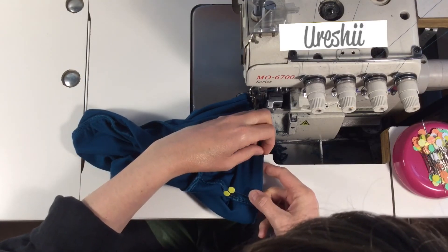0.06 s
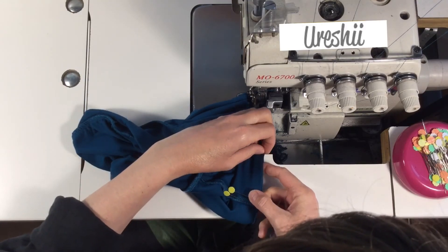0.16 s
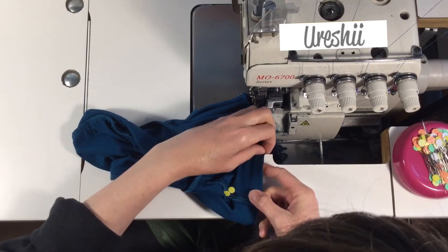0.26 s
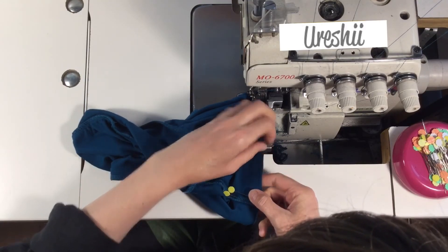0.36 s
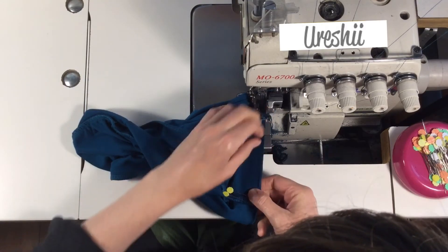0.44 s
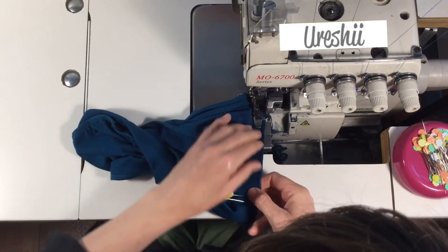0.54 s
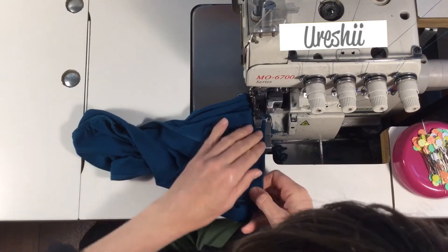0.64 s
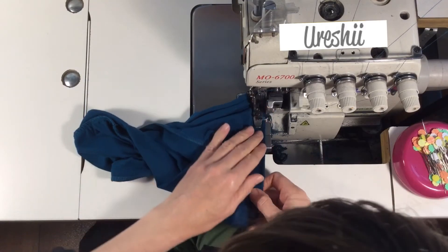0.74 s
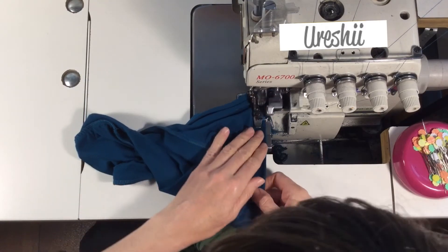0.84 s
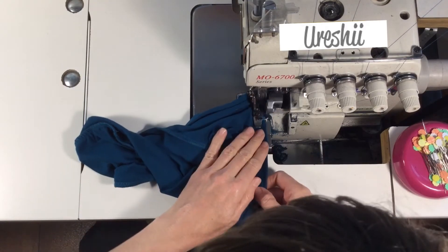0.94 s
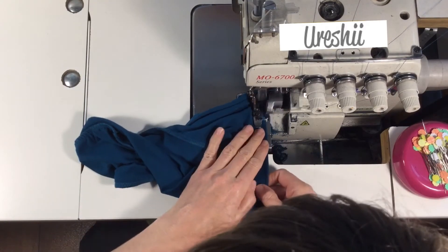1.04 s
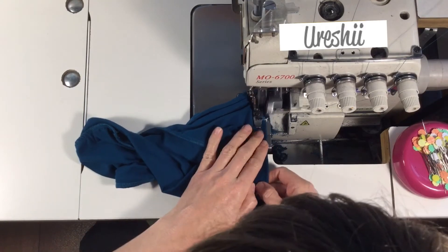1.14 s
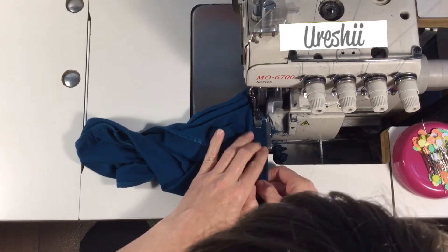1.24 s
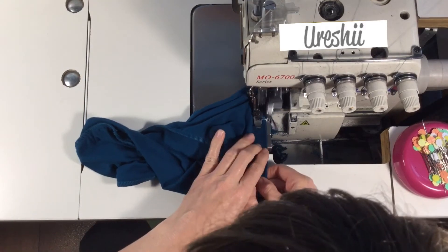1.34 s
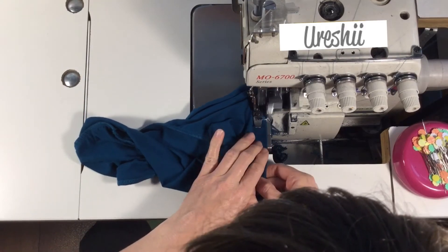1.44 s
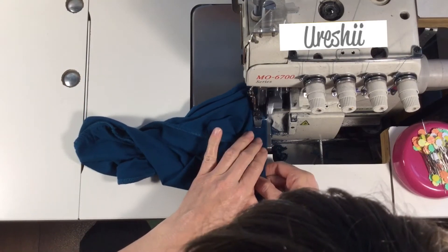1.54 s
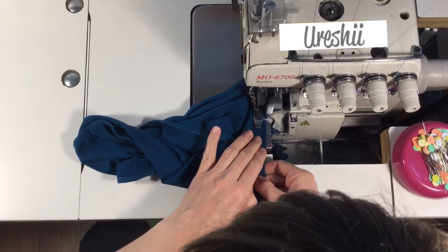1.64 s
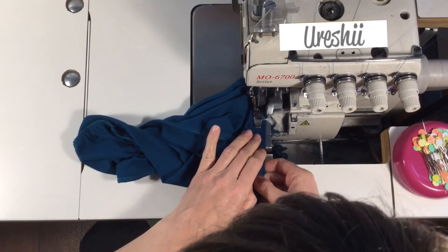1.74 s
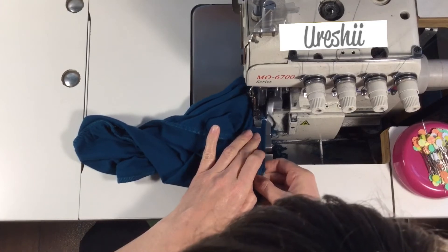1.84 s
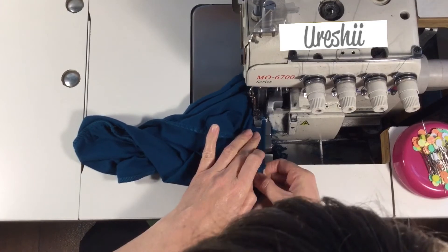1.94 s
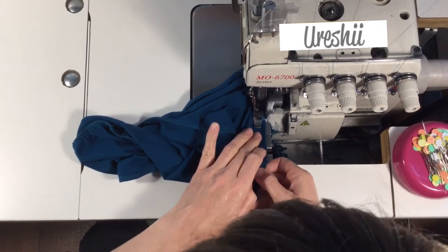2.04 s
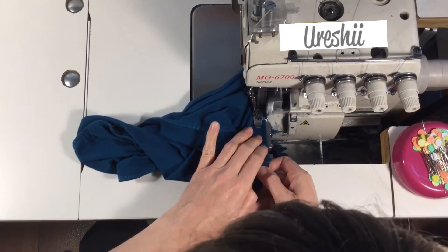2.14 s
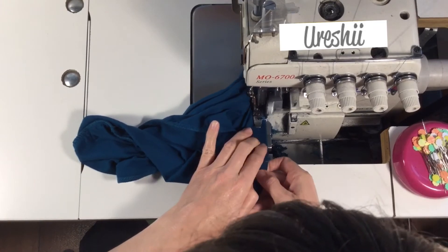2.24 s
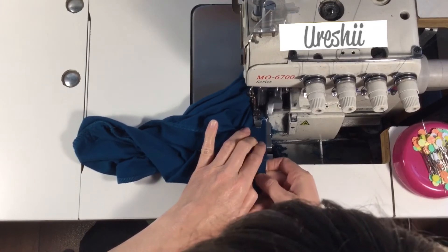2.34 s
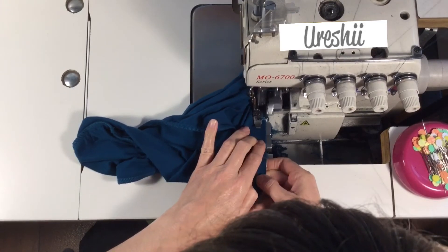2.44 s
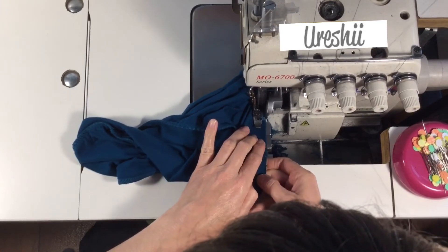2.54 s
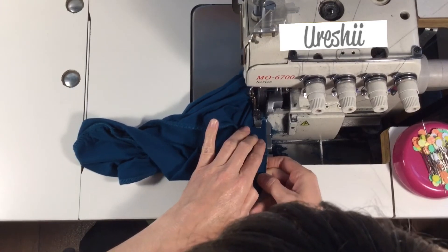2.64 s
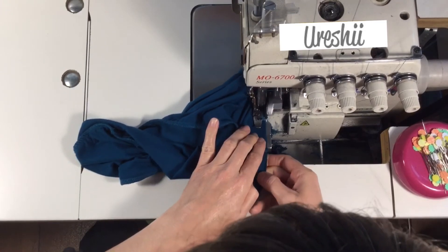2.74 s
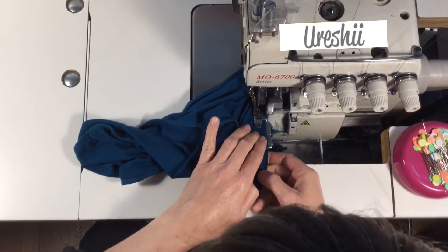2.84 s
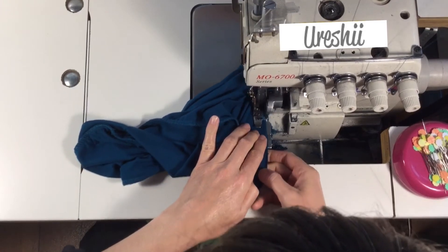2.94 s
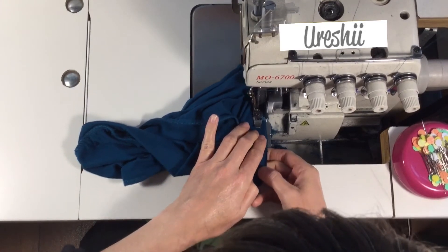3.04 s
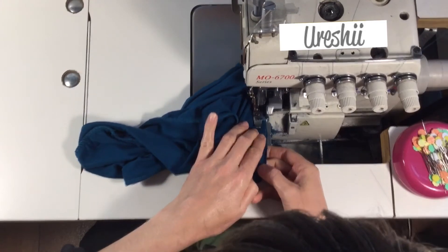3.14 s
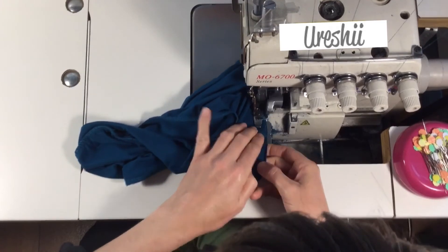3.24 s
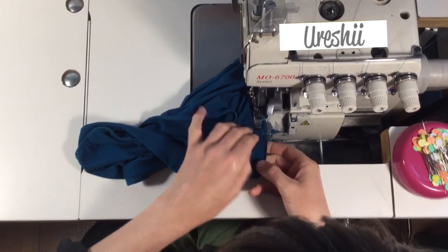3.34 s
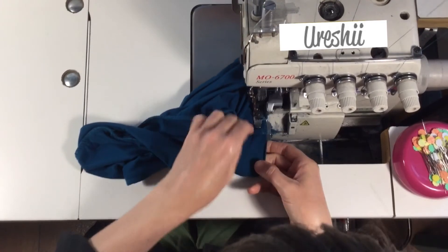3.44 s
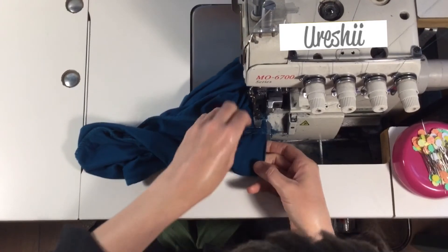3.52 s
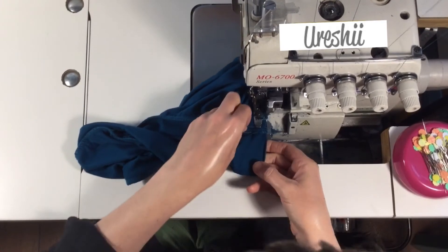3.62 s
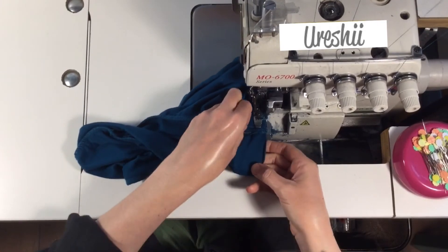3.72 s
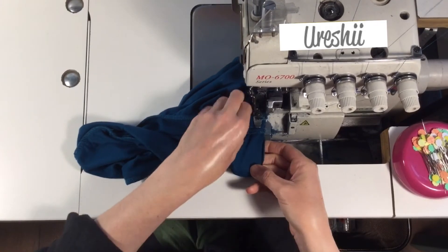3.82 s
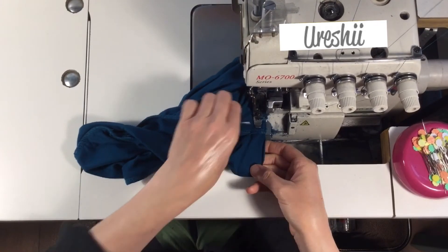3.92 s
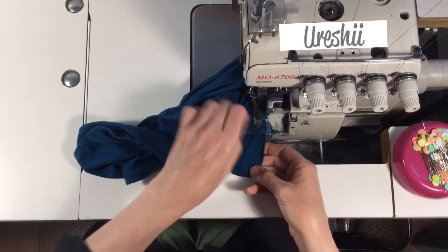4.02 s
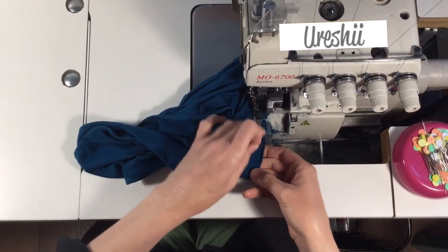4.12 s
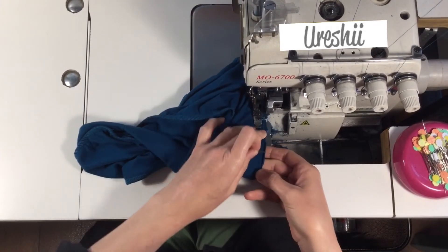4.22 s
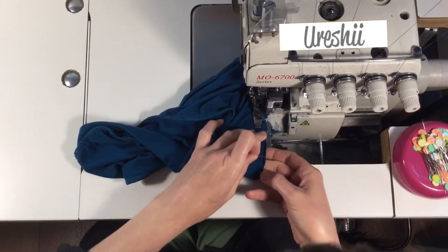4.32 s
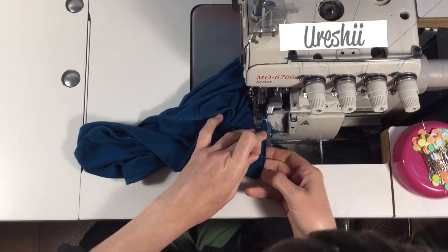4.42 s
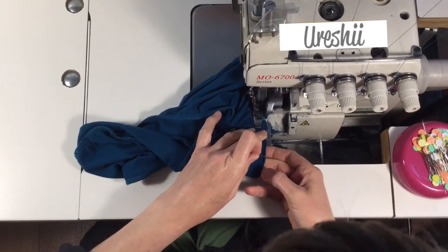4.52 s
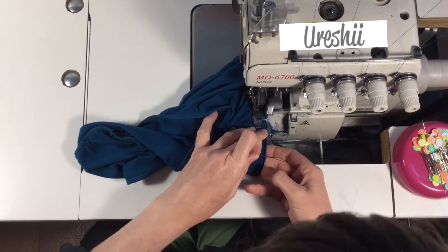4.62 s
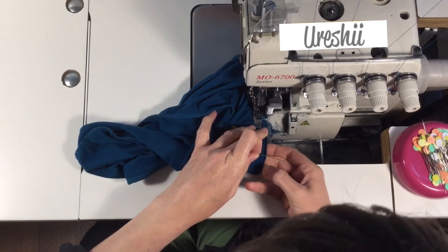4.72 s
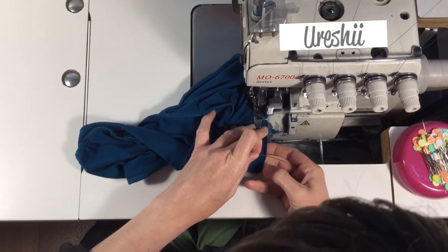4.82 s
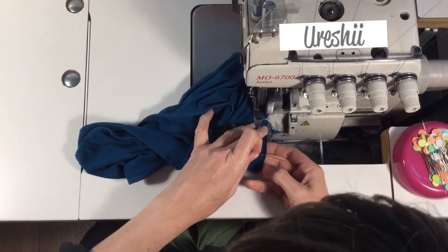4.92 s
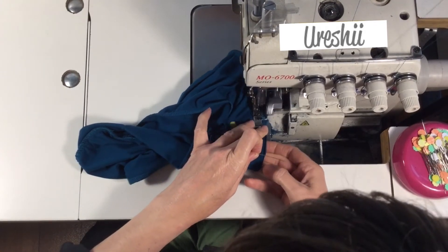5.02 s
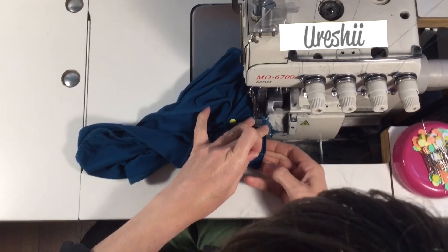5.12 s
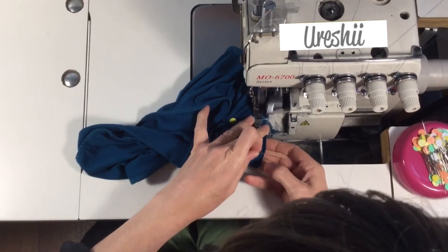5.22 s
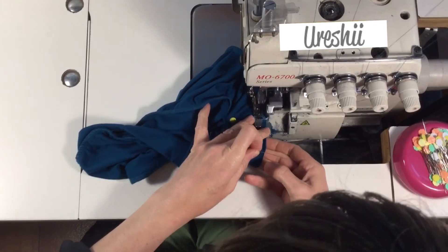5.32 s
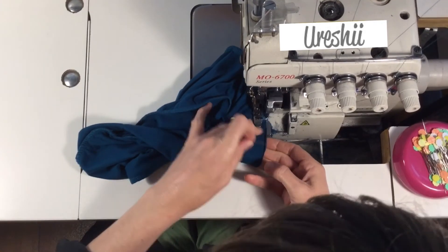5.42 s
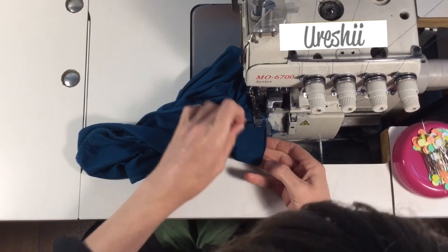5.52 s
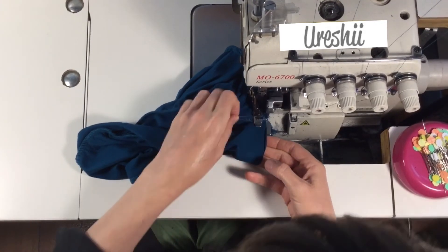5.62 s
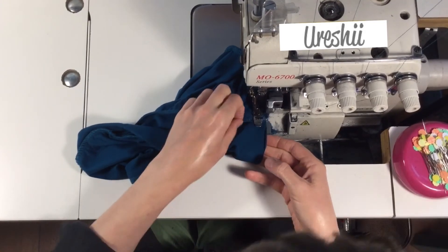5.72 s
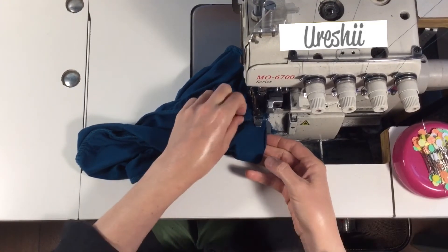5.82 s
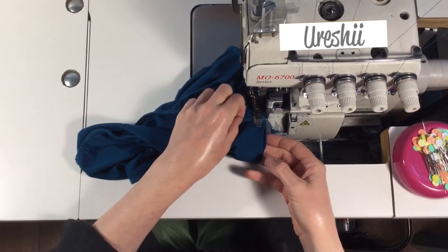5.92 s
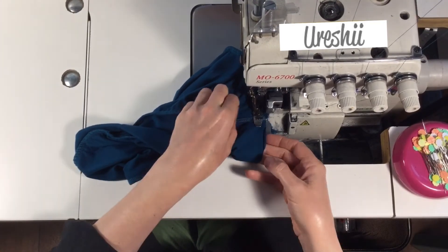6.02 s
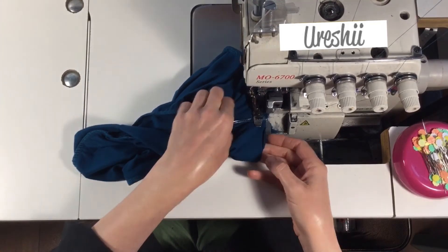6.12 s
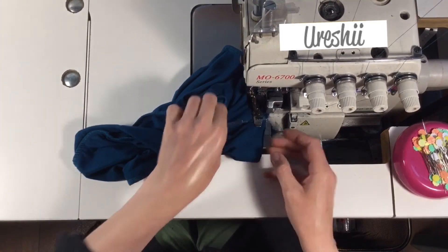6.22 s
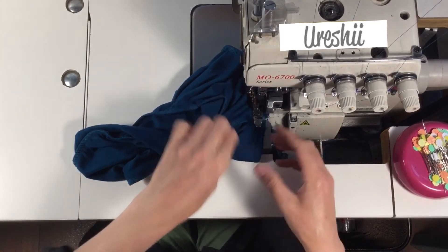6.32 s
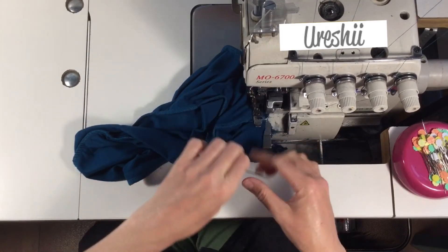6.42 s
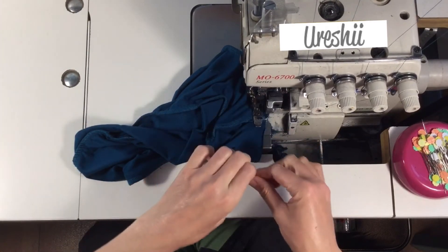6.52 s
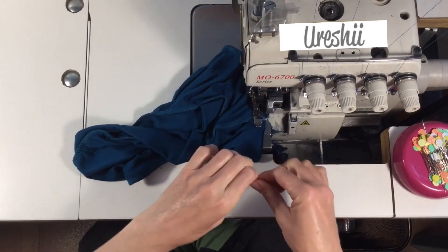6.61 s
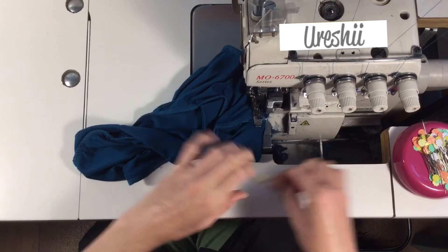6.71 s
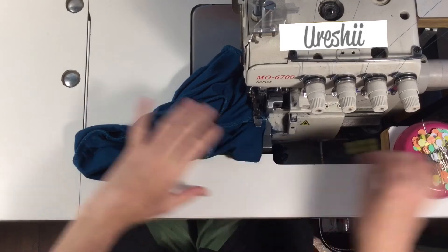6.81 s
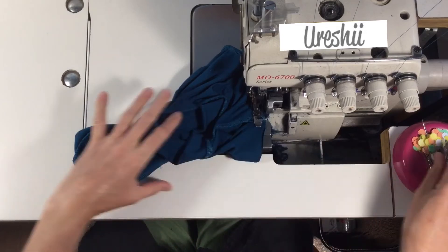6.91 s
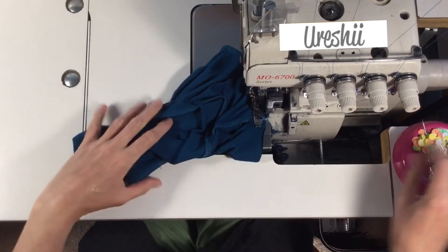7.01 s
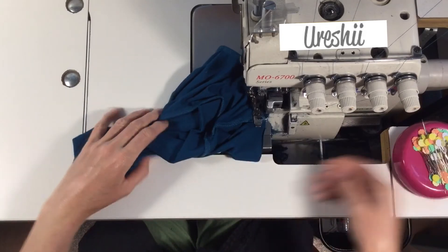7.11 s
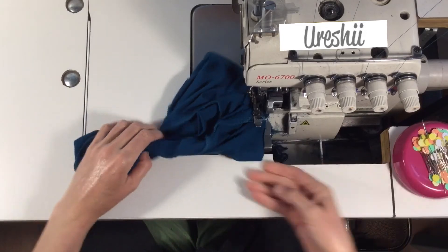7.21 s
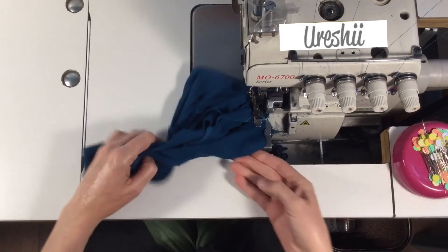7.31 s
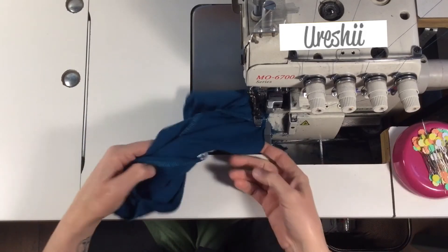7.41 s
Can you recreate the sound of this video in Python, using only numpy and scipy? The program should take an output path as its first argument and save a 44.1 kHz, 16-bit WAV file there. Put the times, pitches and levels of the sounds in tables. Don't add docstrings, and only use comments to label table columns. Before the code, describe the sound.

Close, dry perspective above an overlocker on a wooden table, in a quiet room with a low hush and short reverberation. At 0.6-0.75 seconds the pedal and linkage knock and the clutch bites. From 0.84 the machine starts slowly, races to about 23 stitches a second by 1.35, then settles near 18: crisp knife and looper clicks, ringing cover plate, gliding toothed-belt whine, gritty clutch rub and casing rattle, varying with the seam. It slows after 3.2; the brake clunks and hisses around 3.4, stopping by 3.5. A tiny tick falls at 3.85. Knocks at 4.2-4.3 begin a shorter burst, distinct slow clicks from 4.42 accelerating to 5.1, then a solid brake clunk at 5.2 and fading drag. Small ticks at 5.75 and 6.0. At 6.88 pins land in a bright, glassy scatter with brief cloth rustle; light ticks and faint fabric follow around 7.3.

```python
import sys
import numpy as np
from scipy import signal
from scipy.fft import rfft, irfft, next_fast_len
from scipy.io import wavfile
from scipy.ndimage import uniform_filter1d, map_coordinates

SR = 44100
rng = np.random.default_rng(int(sys.argv[2]) if len(sys.argv) > 2 else 0)


def volts(x):
    e = np.asarray(x, float) / 20
    return 10 ** e


def dump_mix(stems):
    frames = np.atleast_2d(stems).T
    limited = np.clip(frames, -1, 1)
    pcm = np.round(limited * 32767).astype(np.int16)
    wavfile.write(sys.argv[1], SR, pcm)


N = 328986

# clutch_engages_s, first_stitch_s, pedal_lifts_s, shaft_stops_s, knife_click_db
RUNS = [
    (0.732, 0.8391, 3.306, 3.52, -34.5),
    (4.325, 4.4194, 5.15, 5.43, -39.5),
]
# time_s, stitches_per_s
SPEED_LONG = [(0.838, 4.43), (1.001, 8.22), (1.208, 20.71), (1.349, 22.78), (1.571, 19.18), (1.853, 18.3),
              (2.254, 19.06), (2.479, 17.29), (2.969, 17.43), (3.233, 16.05), (3.36, 9.08)]
# time_s, stitches_per_s
SPEED_SHORT = [(4.42, 4.53), (4.6, 7.93), (4.79, 10.29), (4.97, 16.27), (5.06, 17.56), (5.2, 15.34)]
# time_s, extra_blow_db
SEAM = [(.84, -3.5), (1.0, 2.5), (1.1, -0.5), (1.21, 4.5), (1.36, -2), (1.98, 4.5), (2.12, -4.5),
        (2.6, 0.5), (2.76, -4), (3.2, 4.5), (3.27, -1.5), (3.35, -11), (4.42, -3), (4.7, -4.5), (4.81, 1),
        (4.89, -4), (4.96, 2), (5.13, 0.5)]
WHINE_ORDERS = [1, 2, 3, 3.5, 4]
# centre_hz, width_hz, level_db
MOUNT = [(185, 55, 10.5), (388, 46, 9), (483, 110, 4), (704, 40, 10), (850, 50, 11), (1407, 55, 10),
         (1580, 80, 8.5), (1850, 52, 2)]
# centre_hz, width_hz, level_db
BOARD = [(298.2, 20.4, 9)]
# centre_hz, width_hz, level_db
CLUTCH = [(3232, 94, 1.5), (3488, 58, -1), (3680, 100, -6.5), (3880, 130, -5.5), (4080, 60, -4),
          (3525, 28, -8.5)]
# centre_hz, width_hz, level_db
PLATES = [(2900, 275, 6), (5050, 120, -9), (8770, 410, -3.5), (11260, 170, -10), (14500, 5600, -14.5),
          (6700, 3200, -19.5), (10400, 3300, -23)]
# centre_hz, width_hz, level_db
CASING = [(584, 59, 6), (796, 173, -0.5), (1208, 210, 2), (1405, 60, 6), (1572, 32, 4), (1810, 107, 4.5),
          (2300, 1300, -8.5)]
# centre_hz, width_hz, level_db
TABLE = [(59, 32, -2), (133, 51, -2), (196, 44, -3), (304, 48, 1), (396, 98, -1.5)]
# pitch_hz, level_db, t60_s
COVER = [(723.7, 1, 0.057), (723.4, -16, 0.13), (594, -5.5, 0.032), (1822, -1.5, 0.029), (5100, -27, 0.06)]
# freq_hz, level_db
KNIFE = [(2000, 10.5), (4000, 8.5), (6000, 4), (9000, 2.5), (12000, -9), (15500, -2)]
# centre_hz, width_hz, level_db
LOOPER = [(6160, 1100, -15.5), (11160, 660, 8.5), (13700, 2000, 3)]
# freq_hz, density_db_per_hz
PEDAL = [(180, -63), (300, 3.5), (560, 1), (1320, -5), (1630, -7), (2470, -16), (2840, -12), (4000, -5),
         (5000, -9.5), (6500, -37), (11000, -120)]
# centre_hz, width_hz, level_db
LINK = [(1570, 170, -0.5), (1960, 66, 0.5), (2250, 250, -2)]
# (thud_db, bright_db, link_ring_db, clutch_bite_db), [(time_s, peak_db), ..]
TOUCH = (-28, -31, -5.5, -16), [(.58, -37.5), (4.176, -36.5)]
SLACK = (-10, -21, -5.5, -41), [(.673, -37.5), (4.26, -40.5)]
BITE = (-12, -22, -22, 1), [(.735, -39), (.825, -51.5), (4.326, -41.5)]
BRAKE = (-10, -14.5, -30, -34), [(3.375, -31.5), (3.392, -36), (5.203, -29.5), (5.218, -39), (5.233, -39.5)]
SETTLE = (-10, -27, -7, -24), [(3.422, -40.5), (3.445, -46.5), (5.268, -52)]
DRAG = (-25, -28, -9, 5), [(3.47, -54), (3.51, -67), (5.345, -57), (5.372, -55), (5.44, -76)]
KNOCK_THUMP_DB = [-15.5, -25, -15.5]
# time_s, mode_1_db, mode_2_db, mode_3_db
JOLTS = [(3.198, -35, -46, -45), (3.263, -35, -53, -47), (3.297, -41, -50, -62), (3.496, -46.5, -62, -63),
         (3.549, -52, -70, -75), (4.503, -45, -52, -60), (4.559, -47, -66, -58), (5.138, -33, -34, -30.5),
         (5.162, -55, -40, -60), (5.266, -37.5, -56, -41)]
# pitch_hz, t60_s
LEGS = [(135, 0.13), (305, 0.14), (580, 0.063)]
# time_s, peak_db, low_part_db, t60_s, dish_ring_db
TICKS = [(3.577, -67, -12, 0.039, -11), (3.5935, -68, -14, 0.038, -6), (3.8462, -49.5, -19, 0.05, -14),
         (5.747, -45, -17.5, 0.058, -24), (6.0092, -57, -14, 0.059, -10),
         (7.2606, -45.5, -21.5, 0.076, -9.5), (7.2894, -48, -24, 0.058, -11), (7.311, -50, -20, 0.05, -12),
         (7.3407, -50, -1.5, 0.047, -17)]
# time_s, peak_db, low_part_db, t60_s, dish_ring_db
DROP = [
    (6.873, -36.5, -41, 0.066, -10),
    (6.88, -20, -34.5, 0.06, -19.5),
    (6.8876, -24.5, -20, 0.04, -22),
    (6.8936, -28, -30, 0.04, -20),
]
# freq_hz, density_db_per_hz
PINS = [(1180, -9), (2000, -10), (2880, -14.5), (3510, -6.5), (4280, -10), (4590, -3.5), (5450, -12),
        (10100, -7), (13900, 2.5), (15800, -5.5)]
# centre_hz, width_hz, level_db
DISH = [(5520, 380, 8), (6430, 480, 4), (8630, 880, 2), (10400, 610, -13)]
# peak_s, peak_db, swell_s, fade_s (both to -20 dB)
RUSTLE = [(5.762, -71, .01, 0.071), (6.17, -67.5, 0.13, .1), (6.92, -52, .01, 0.098),
          (7.19, -66, 0.19, .15), (7.264, -66, .04, .02), (7.4, -75, .4, .4)]
# freq_hz, t60_s
WALLS = [(200, 0.63), (2000, 0.3), (10000, 0.17)]
# freq_hz, density_db_per_hz
HUSH = [(15, -43), (25, -12.5), (64, -4), (195, -10), (277, -6), (317, -14), (373, -14), (489, -21),
        (677, -20.5), (1130, -26), (1440, -30), (3520, -32), (16000, -41)]


def unit(x):
    return x / np.sqrt(np.mean(x ** 2) + 1e-20)


def along(points, hz):
    f, v = np.transpose(points)
    return np.interp(np.log(hz + 1), np.log(f + 1), v)


def wobble(rate_hz):
    knots = rng.standard_normal(int(N * rate_hz / SR) + 4)
    return map_coordinates(knots, [np.arange(N) * rate_hz / SR])


def filtered(x, response):
    m = next_fast_len(N + SR // 2)
    return irfft(rfft(x, m) * response(np.fft.rfftfreq(m, 1 / SR)), m)[..., :N]


def body(modes):
    def mode(f, c, w, db):
        return volts(db) * 1j * f * w / (c * c - f * f + 1j * f * w)
    return lambda f: sum((-1) ** k * mode(f, *row) for k, row in enumerate(modes))


def colour(points):
    return lambda f: volts(along(points, f)) * (f > .7 * points[0][0])


def hiss(response, rough_db=0, rate=150):
    grain = volts(rough_db * wobble(rate)) if rough_db else 1
    return unit(filtered(rng.standard_normal(N) * grain, response))


def bursts(times, dbs, t60, rise=0.00037):
    env, t = np.zeros(N + SR), np.arange(SR // 3) / SR
    for s, db, d in np.broadcast(times, dbs, t60):
        env[round(s * SR):][:len(t)] += volts(db - 60 * t / abs(d)) * (1 - np.exp(-t / rise))
    return env[:N]


def shaft():
    t = np.arange(N) / SR
    cruise_stitches_per_s = 18
    speed = np.interp(t, *np.transpose(SPEED_LONG + SPEED_SHORT))
    engage, first, lift, stop, click_db = np.array(RUNS)[(t >= RUNS[1][0]) * 1].T
    speed_db = 20 * np.log10(speed / cruise_stitches_per_s)
    return speed, speed_db, t > engage, np.maximum(t - lift, 0), np.maximum(t - stop, 0)


def stitch_times():
    t = np.arange(N) / SR
    turns, rows = np.cumsum(shaft()[0]) / SR, []
    for (engage, first, lift, stop, click_db), speed in zip(RUNS, (SPEED_LONG, SPEED_SHORT)):
        start, end = np.interp([first, speed[-1][0] - .009], t, turns)
        rows += [(s, click_db) for s in np.interp(np.arange(start, end), turns, t)]
    return np.transpose(rows)


def knocks():
    kinds = (TOUCH, SLACK, BITE, BRAKE, SETTLE, DRAG)
    return np.array([(s, db, *parts) for parts, hits in kinds for s, db in hits])


def drum(f):
    return body(CLUTCH)(f) / (1 + ((f - 3650) / 560) ** 8)


def stitches():
    s, click_db = stitch_times()
    scatter = rng.standard_normal((len(s), 3))
    chance = rng.standard_normal((len(s), 2 + 2 * len(COVER)))
    speed_db = shaft()[1][(s * SR).astype(int)]
    seam_db = np.interp(s, *np.transpose(SEAM))
    click_db = click_db + 1.4 * scatter[:, 0]
    ring_db = -35.5 + 0.71 * speed_db + seam_db + 1.26 * scatter[:, 1]
    clack_db = -42.5 + 0.82 * seam_db + 4 * scatter[:, 2]

    clicks = bursts(s, click_db - 9.5, 0.0065, rise=0.00032) + bursts(s, click_db - 11.5, 0.11)
    clicks = clicks + bursts(s, click_db - 7.5 - 0.96 * speed_db, 0.002, rise=.0001)
    looper = bursts(s + 0.0057, click_db - 12 + 3 * chance[:, 0], 0.014) * hiss(body(LOOPER))
    clack = bursts(s - .003, clack_db, 0.069, rise=0.0033) * hiss(body(CASING))
    load = bursts(s - .006, click_db - 9.0 + 2.6 * chance[:, 1], 0.05, rise=0.009) * hiss(drum)

    plate, t = np.zeros(N + SR), np.arange(SR // 4) / SR
    swell = 1 - np.exp(-(t / 0.012) ** 2)
    for start, db, luck in zip(s, ring_db, chance[:, 2:].reshape(len(s), -1, 2)):
        ring = sum(volts(level + 2.2 * a - 60 * t / t60) * np.sin(2 * np.pi * hz * (1 + 0.005 * b) * t)
                   for (hz, level, t60), (a, b) in zip(COVER, luck))
        plate[round((start + .0012) * SR):][:len(t)] += volts(db + 12.5) * ring * swell
    return clicks * hiss(colour(KNIFE)) + clack + load + looper + plate[:N]


def belt():
    speed, speed_db, engaged, coasting, stopped = shaft()
    teeth = 23
    order_db = [-56.5, -66.5, -63.5, -69, -65]
    hz = teeth * speed
    turn = 2 * np.pi * np.cumsum(hz * (1 + 0.00893 * wobble(45))) / SR
    flap_db = 1.74 + 5 * np.clip(1.7 - hz / 220, 0, 1)
    strain_db = 2.47 * np.sin(turn / teeth + 1.94 * wobble(3.04))
    slack_db = .17 * np.clip(-np.gradient(speed) * SR - 18, 0, None)
    level_db = 1.23 * speed_db - 900 * coasting + strain_db - slack_db
    grid_hz = np.arange(3000.)
    carried = np.sqrt(sum(abs(body([mode])(grid_hz)) ** 2 for mode in MOUNT) + 1)

    whine = np.zeros(N)
    for k, db in zip(WHINE_ORDERS, order_db):
        tone_db = db + 4.0 + level_db + flap_db * wobble(28)
        if k > 1:
            tone_db = tone_db + 1.34 * wobble(5) + 2.3 * np.minimum(speed_db, 0)
        whine += volts(tone_db) * np.interp(k * hz, grid_hz, carried) * np.sin(k * turn)
    whine = engaged * whine
    return whine + filtered(whine, lambda f: body(BOARD)(f) ** 2)


def drive():
    speed, speed_db, engaged, coasting, stopped = shaft()
    accel = uniform_filter1d(abs(np.gradient(speed)) * SR, size=4000)
    effort_db = 0.0587 * accel * (coasting == 0)

    def running_db(cruise_db, db_per_speed_db, coast_db_per_s):
        return cruise_db + db_per_speed_db * speed_db + effort_db - coast_db_per_s * coasting - 298 * stopped

    rub = hiss(drum, rough_db=2, rate=140) + volts(-7.5) * hiss(body(PLATES), rough_db=2.5)
    rub = volts(running_db(-49, 1.06, 105) + 2.0) * rub
    gears = volts(running_db(-48, .9, 53) - 3.0) * hiss(body(CASING), rough_db=2.0, rate=90)
    shake_db = running_db(-64.5, 0.33, 33) + 5.0 + 2.2 * wobble(4.14)
    shake = volts(shake_db) * hiss(body(TABLE), rough_db=3.0, rate=30)
    return engaged * (rub + gears + shake)


def pedal():
    s, db, low_db, high_db, link_db, bite_db = knocks().T

    def clank_gain(f):
        return colour(PEDAL)(f) * (0.97 + abs(body(CASING)(f)))

    def edge_gain(f):
        return colour(KNIFE)(f) + abs(body([(11500, 120, 6)])(f))

    clank = bursts(s, db - 13.0, 0.23, rise=0.0011) * hiss(clank_gain, rough_db=1.0, rate=320)
    edge = bursts(s, db + high_db + .5, 0.21) * hiss(edge_gain, rough_db=1.0, rate=280)
    link = bursts(s, db + link_db - 8.5, 0.24, rise=0.0077) * hiss(body(LINK), rough_db=1)
    crack = bursts(s, db + link_db - 4, 0.0095, rise=.0008) * hiss(body(CASING + LINK))
    bite = bursts(s, db + bite_db - 8, 0.24) * hiss(drum, rough_db=4.5)
    thud = bursts(s, db + low_db - .5, 0.22, rise=0.0037) * hiss(body(TABLE))
    return clank + edge + link + crack + bite + thud


def thumps():
    x, t = np.zeros(N + SR), np.arange(SR // 4) / SR
    blows = JOLTS + [(s, *np.add(db, KNOCK_THUMP_DB)) for s, db in knocks()[:, :2]]
    for s, *levels in blows:
        ring = 0
        for db, (hz, t60) in zip(levels, LEGS):
            detune = 1 + 0.037 * rng.standard_normal()
            ring = ring + volts(db - 60 * t / t60) * np.sin(2 * np.pi * hz * detune * t)
        x[round(s * SR):][:len(t)] += ring * (1 - np.exp(-t / 0.0037))
    return x[:N]


def pins():
    s, db, low_db, t60, ring_db = np.vstack([TICKS, DROP]).T
    scatter = bursts(DROP[2][0], DROP[2][1] - 19, 0.23)
    bright = (bursts(s, db - 11.0, t60) + scatter) * hiss(colour(PINS), rough_db=3.5, rate=320)
    ring = bursts(s, db + ring_db - 3.5, 1.46 * t60) * hiss(body(DISH))
    low_modes = [(284, 43, 3.5), (820, 310, 2.0), (1460, 200, 3), (2480, 1100, -10)]
    knock = bursts(s, db + low_db - 4.5, 2.56 * t60, rise=0.0011) * hiss(body(low_modes))
    return bright + ring + knock


def cloth():
    t = np.arange(N) / SR
    slide = sum(volts(db - 20 * np.where(t < at, (at - t) / swell, (t - at) / fade))
                for at, db, swell, fade in RUSTLE)
    return slide * volts(-4) * hiss(body([(15200, 3000, -3), (6700, 15000, -7)]), rough_db=1.0, rate=330)


def room(x):
    hz, t, z = signal.stft(rng.standard_normal(SR // 2), SR, nperseg=256)
    tail = signal.istft(z * volts(-60 * t / along(WALLS, hz)[:, None]), SR, nperseg=256)[1]
    return signal.fftconvolve(np.pad(x, (300, 0)), tail / np.linalg.norm(tail))[:N]


def hush():
    return volts(-66 + 0.15 * wobble(3.5)) * hiss(colour(HUSH), rough_db=-1.5, rate=14)


def scene():
    near = stitches() + belt() + drive() + pedal() + thumps() + pins() + cloth()
    return (near + volts(-10.5) * room(near) + hush())[None]


def band_limit(x):
    return signal.sosfilt(signal.butter(12, 16530, fs=SR, output="sos"), x)


def record(dry):
    heard = filtered(dry, lambda f: (1j * f / (45 + 1j * f)) ** 2 * (f < 15830))
    return band_limit(heard)


dry = scene()
out = record(dry)
dump_mix(out)
```